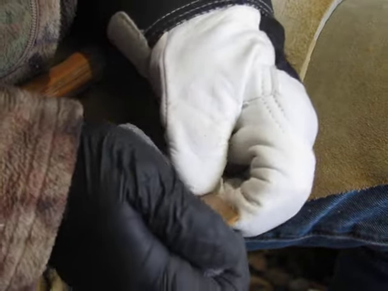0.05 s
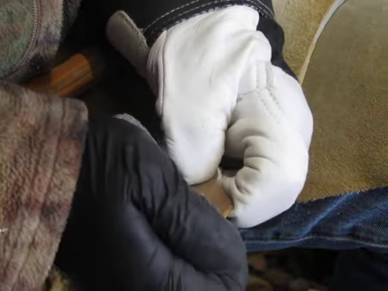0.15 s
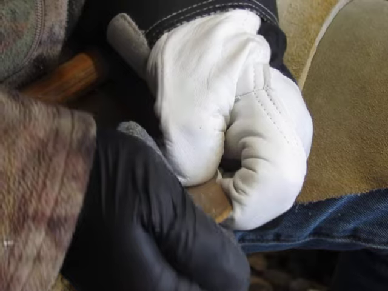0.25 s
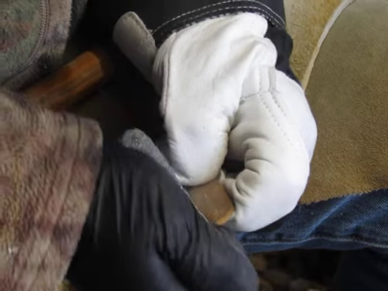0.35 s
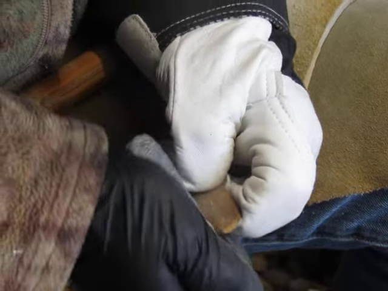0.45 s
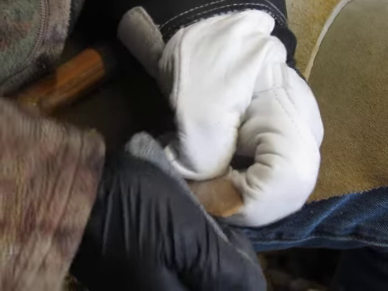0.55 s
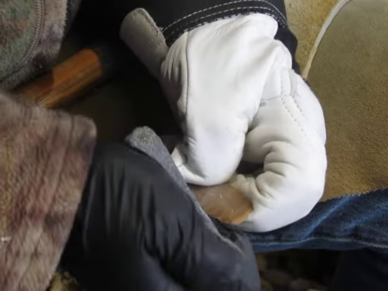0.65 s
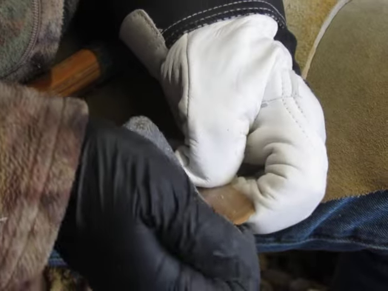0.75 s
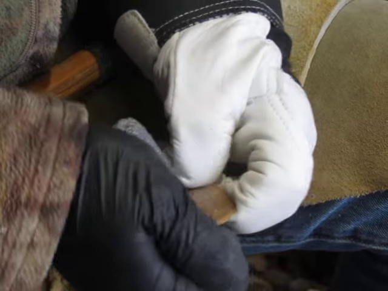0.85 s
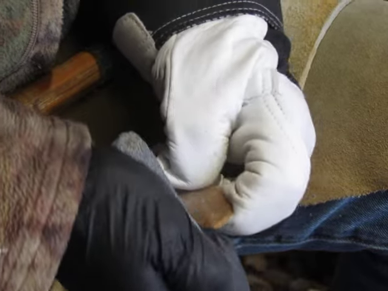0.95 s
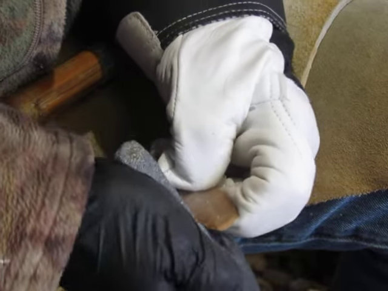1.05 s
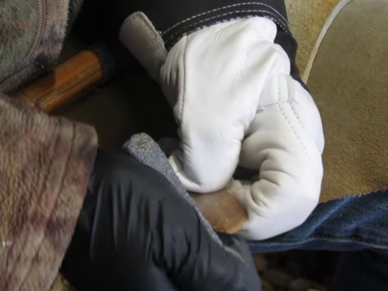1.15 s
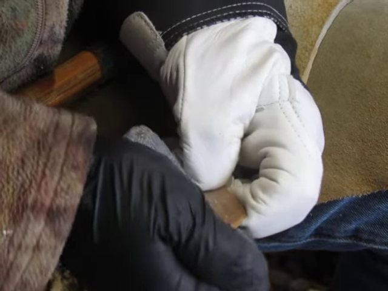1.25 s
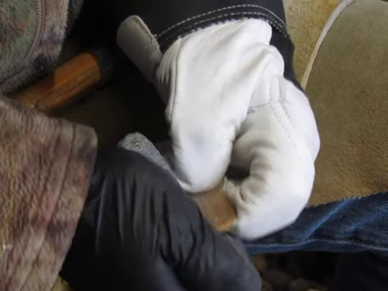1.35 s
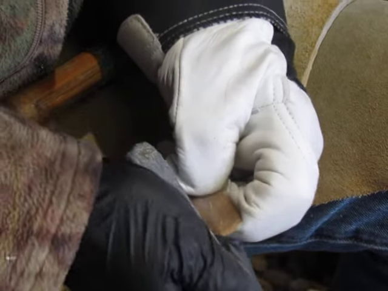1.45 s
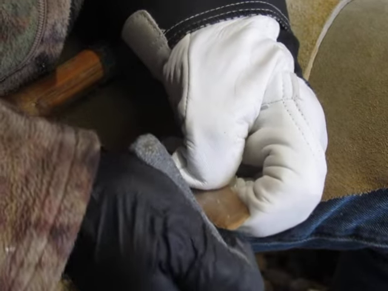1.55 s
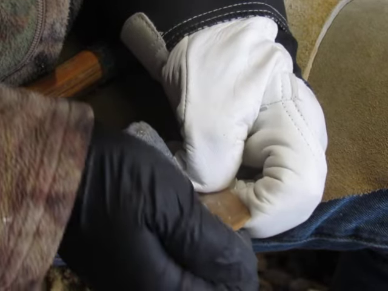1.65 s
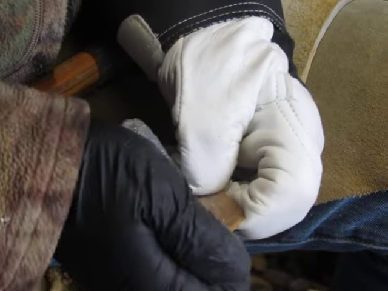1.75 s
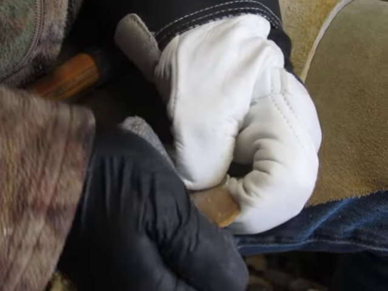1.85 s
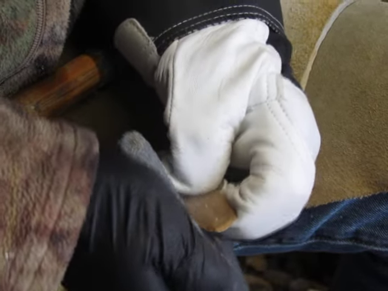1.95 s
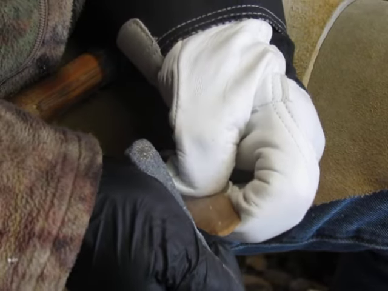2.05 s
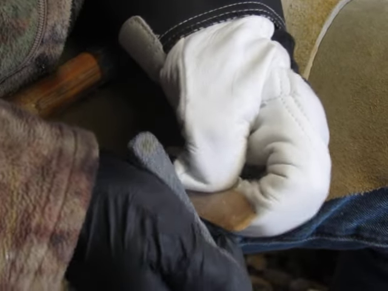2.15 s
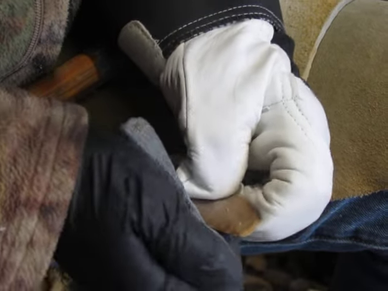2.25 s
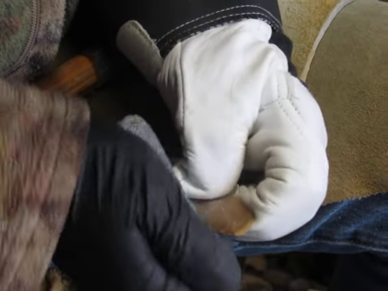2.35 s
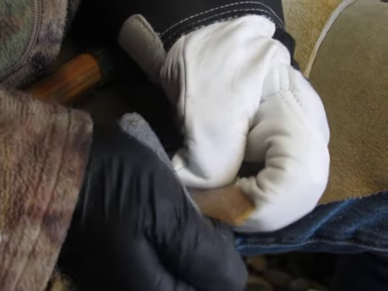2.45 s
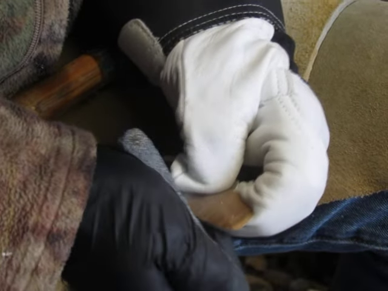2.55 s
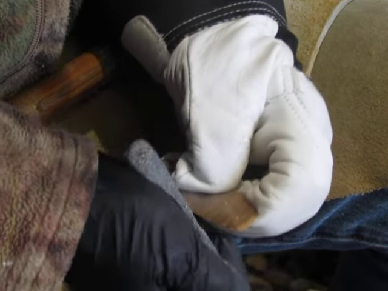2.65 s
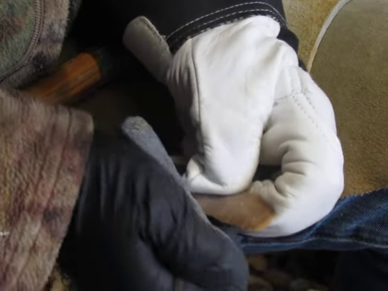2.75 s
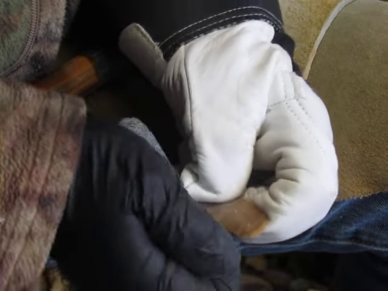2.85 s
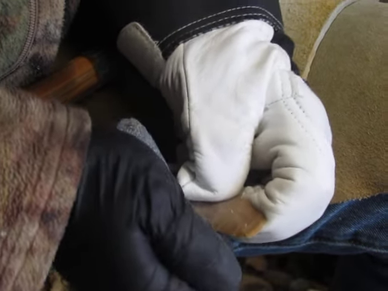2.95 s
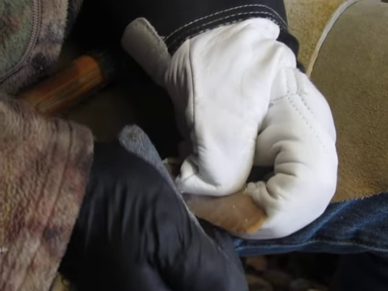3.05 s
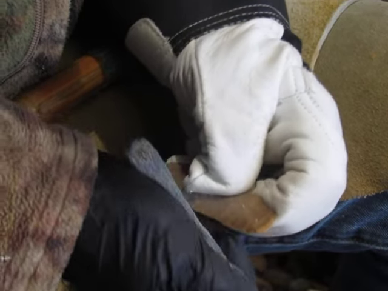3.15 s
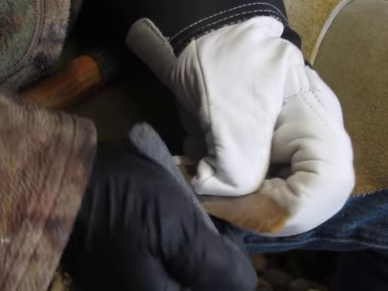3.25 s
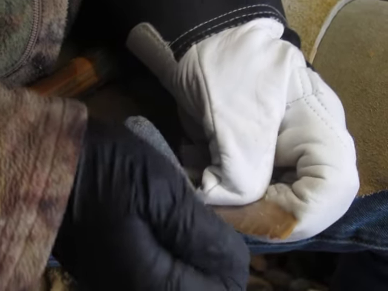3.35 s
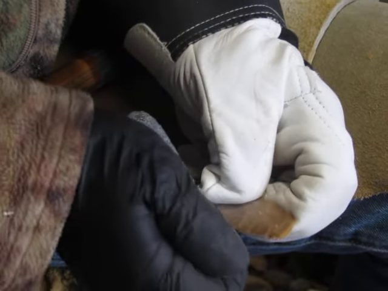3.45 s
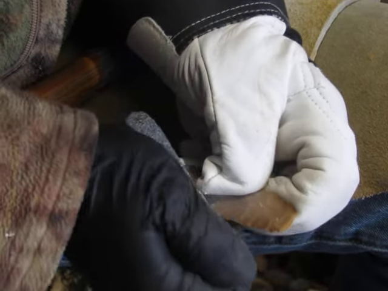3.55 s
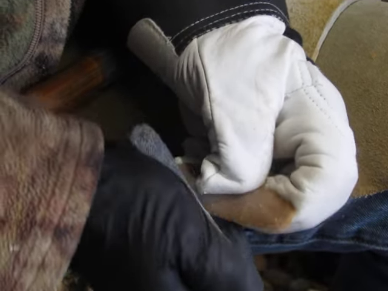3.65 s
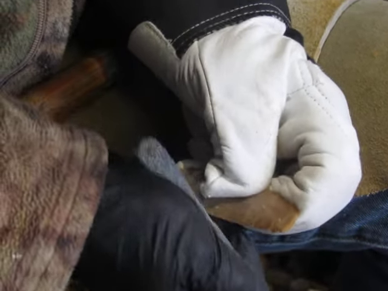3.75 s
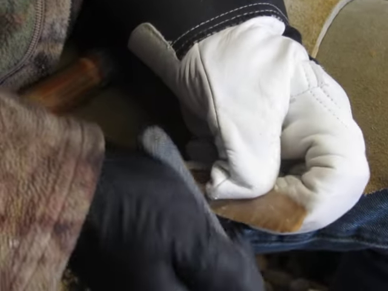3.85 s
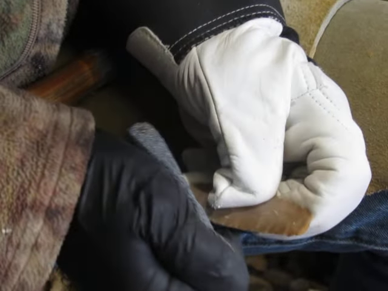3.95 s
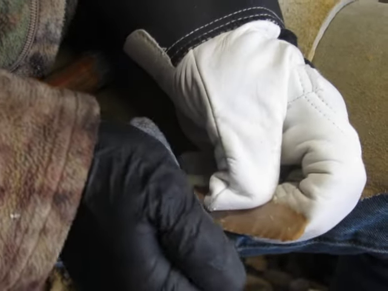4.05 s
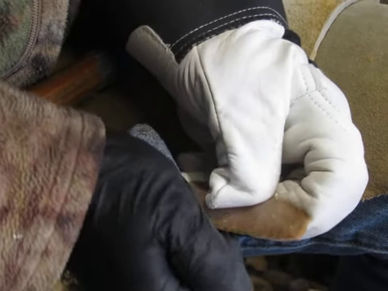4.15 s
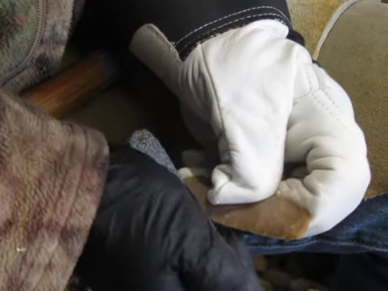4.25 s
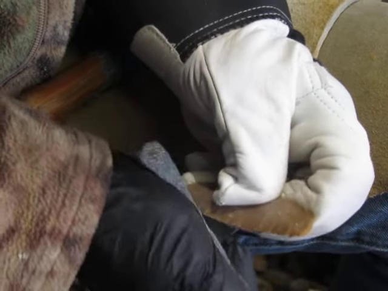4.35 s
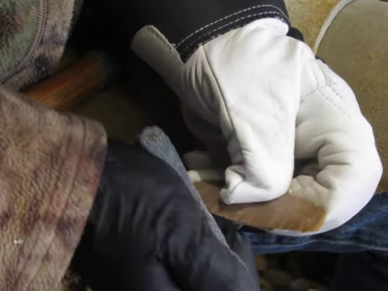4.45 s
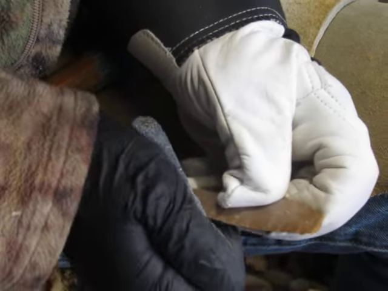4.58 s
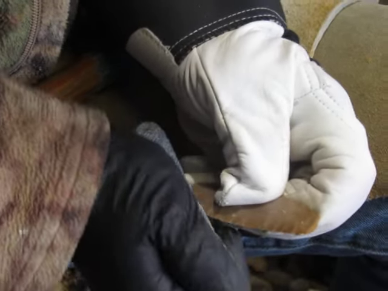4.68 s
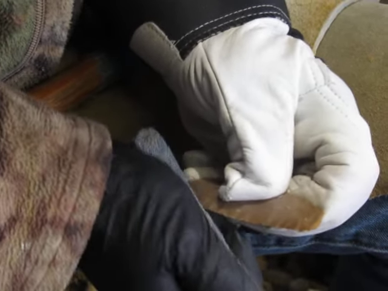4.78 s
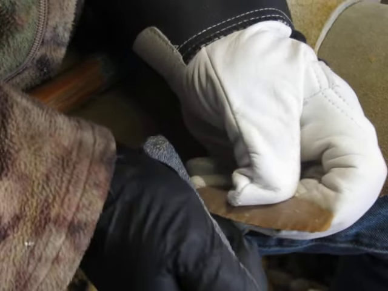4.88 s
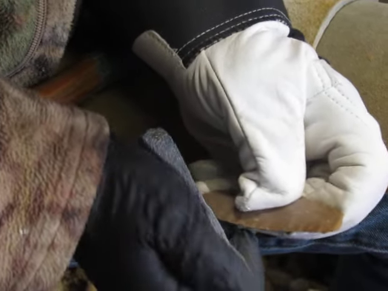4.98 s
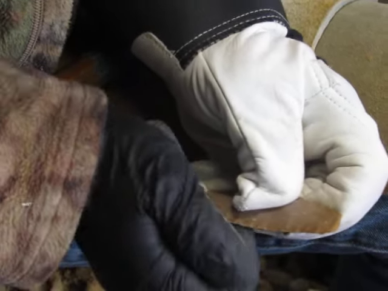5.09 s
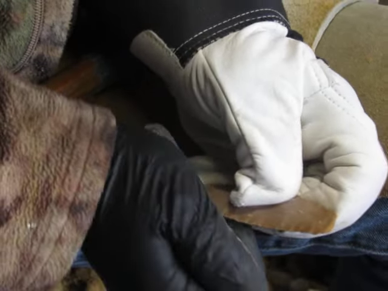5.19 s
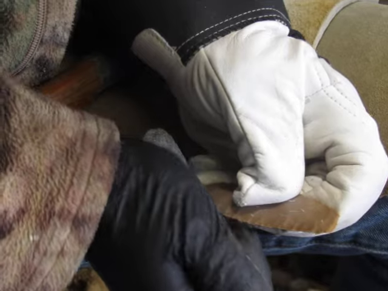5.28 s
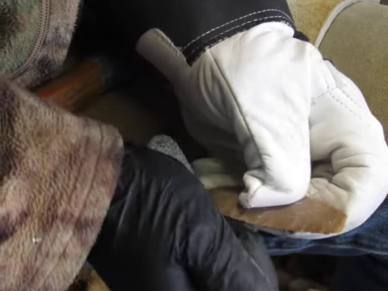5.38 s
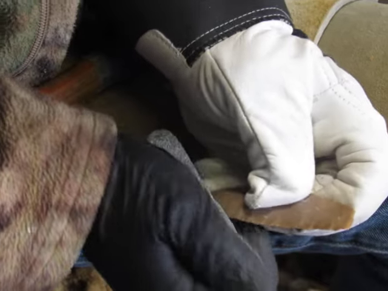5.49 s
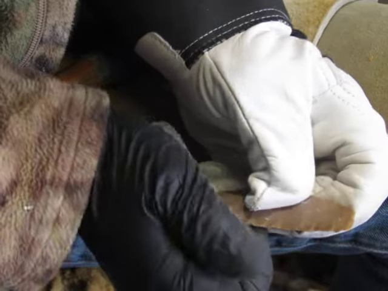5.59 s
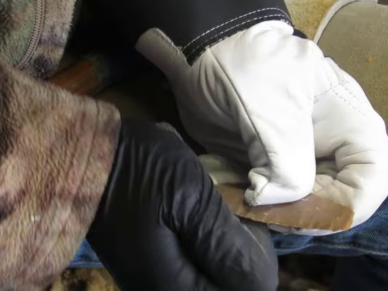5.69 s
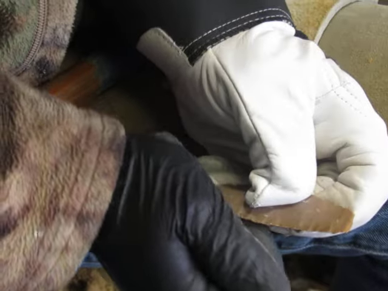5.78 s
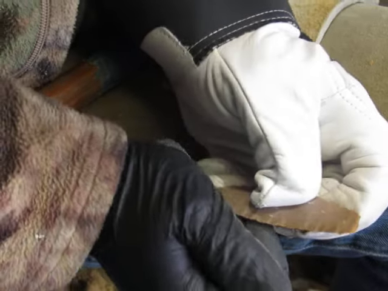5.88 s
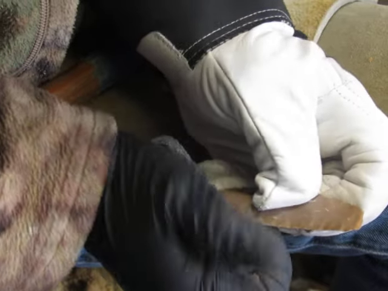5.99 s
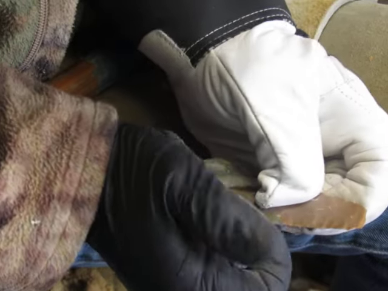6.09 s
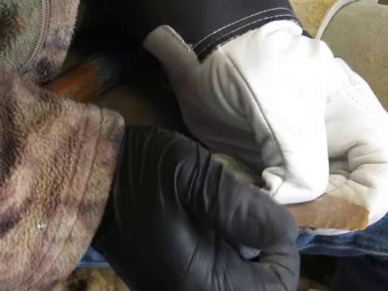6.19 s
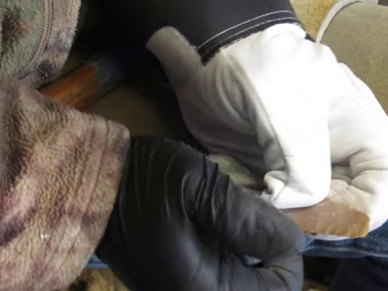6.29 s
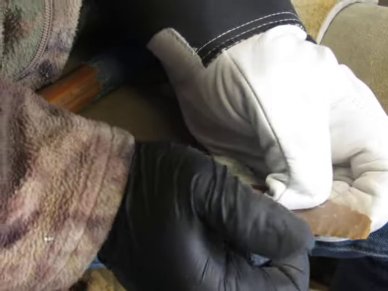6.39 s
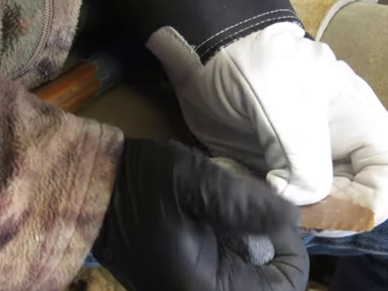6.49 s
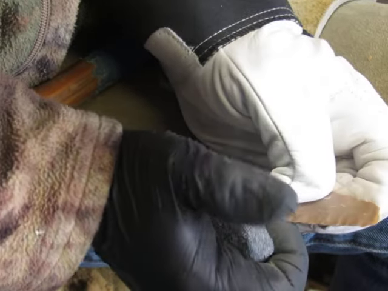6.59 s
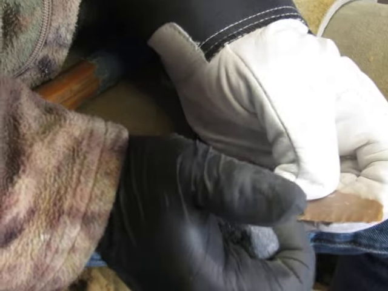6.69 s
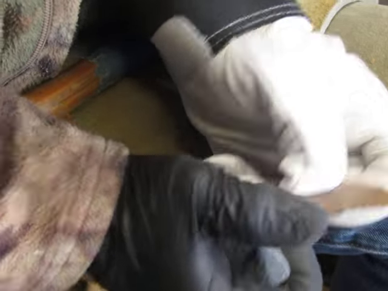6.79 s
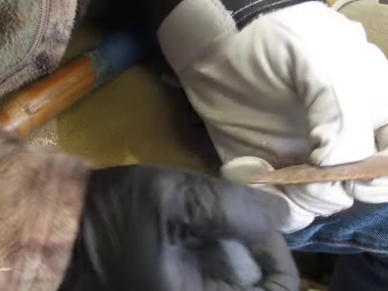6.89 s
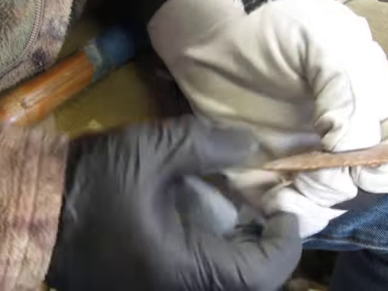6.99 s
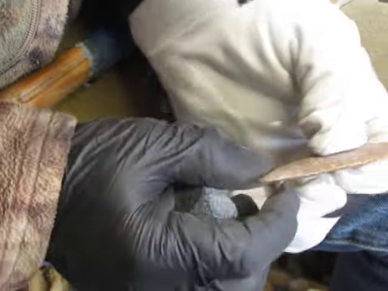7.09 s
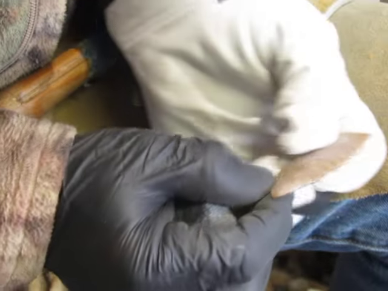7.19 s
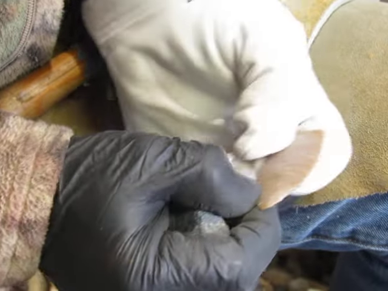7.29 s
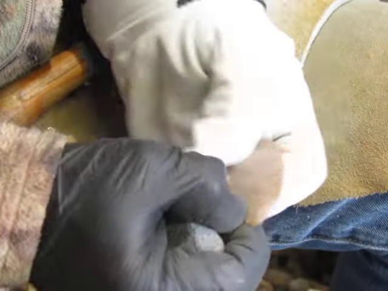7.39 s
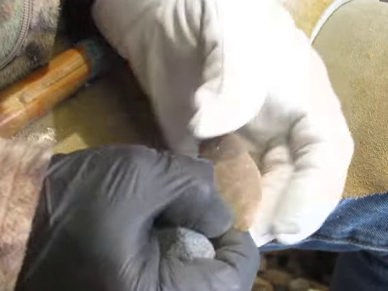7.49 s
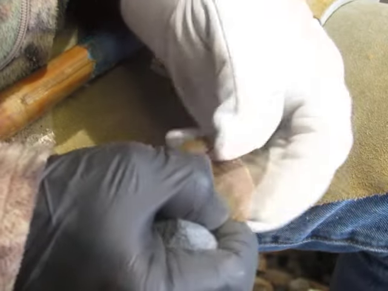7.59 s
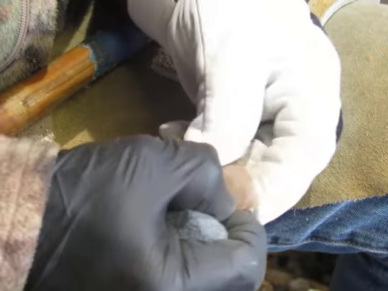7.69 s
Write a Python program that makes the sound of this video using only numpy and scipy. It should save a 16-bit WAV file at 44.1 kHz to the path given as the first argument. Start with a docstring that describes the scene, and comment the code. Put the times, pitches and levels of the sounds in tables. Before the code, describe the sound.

A close stereo microphone in a small workshop hears a coarse little stone grinding a stone edge. A dull sleeve brush fades over the first half second while soft bright hiss sinks away by about 1.2. From 0.1 come short gritty rubs and crisp crunches, with strong snaps near 0.3, 0.55, 1.0 and 2.0 and small gaps between. Faint sliding bird whistles sound around 0.8 and 1.15. From 2.4 the scraping thickens into repeated rasping strokes; from 3.5 to 6.4 they come in busy bunches about every half second, each catch brittle and bright, shedding fine crumbs, with occasional dull taps. Strokes soften and stop by about 6.85. A quiet, wavering low engine hum and distant traffic lie underneath, traffic swelling slightly near 5 and toward the end. Hiss returns around 6.9, with two faint falling whistles just after 7.0 and 7.3, until 7.7.

```python
"""A small coarse stone grinds the edge of a hand-held chert blade in a workshop. Random grains of grit
shake the two stones, which ring briefly: light rubs, sharp catches that shed crumbs, dull taps on contact.
The ring changes colour as the grip shifts. A sleeve brushes; a bright background hiss sinks while the
grinding is under way and rises again as it ends; both are shaped noise. Outside, an engine idles as a few
steady tones, traffic swells as low noise, and a bird whistles as a gliding tone."""
import sys
import numpy as np
from scipy import signal
from scipy.fft import rfft, irfft
from scipy.io import wavfile
from scipy.ndimage import map_coordinates

SR = 44100
rng = np.random.default_rng(int(sys.argv[2]) if len(sys.argv) > 2 else 0)


def dump_mix(stems):
    """Bounce the given channels to the path in sys.argv[1] as a 16-bit WAV at rate SR."""
    frames = np.atleast_2d(stems).T  # one column per channel
    limited = np.clip(frames, -1, 1)  # hard clip at full scale
    pcm = np.round(limited * 32767).astype(np.int16)
    wavfile.write(sys.argv[1], SR, pcm)


N = 340893
TIME = np.arange(N) / SR


def from_db(db):
    """Turn decibels into a gain."""
    return 10 ** (np.asarray(db) / 20)


def rms_one(x):
    """Scale a sound to an rms (average strength) of 1."""
    return x / np.sqrt(np.mean(x ** 2) + 1e-20)


def in_time(rows):
    """Join the points of a curve with straight lines, at every sample."""
    return np.interp(TIME, *np.transpose(rows))


def at_hz(points, hz):
    """Read a curve over pitch, with pitch on a log scale as the ear hears it."""
    points = np.array(points)
    return np.interp(np.log(np.maximum(hz, 1)), np.log(points[:, 0]), points[:, 1])


def drift(rate_hz, size):
    """Smooth random wandering around zero, with a spread of about 1."""
    knots = rng.standard_normal(int(size / SR * rate_hz) + 4)
    return map_coordinates(knots, [1 + np.arange(size) / SR * rate_hz], order=2, mode="nearest")


def add(out, sound, start_s):
    """Mix a sound in at a given time."""
    i = max(round(start_s * SR), 0)
    out[i:i + len(sound)] += sound[:len(out) - i]


# how alike the left and right of the background are: pitch_hz, correlation (no unit)
LEFT_RIGHT_LIKENESS = [(60, 0.4), (150, 0.65), (300, 0), (800, 0.07), (4000, 0.26)]


def background(spectrum):
    """Stereo noise from all around: random waves shaped to a colour, rms 1."""
    hz = np.arange(N // 2 + 1) * SR / N
    alike = np.clip(at_hz(LEFT_RIGHT_LIKENESS, hz), -1, 1)
    mid, side = rfft(rng.standard_normal((2, N)))
    pair = np.sqrt(1 + alike) * mid + np.sqrt(1 - alike) * side * [[1], [-1]]
    return rms_one(irfft(pair * from_db(at_hz(spectrum, hz)), N))


# colour of the still workshop air: pitch_hz, level_db (per Hz)
AIR_COLOUR = [(25, -21), (55, 1.5), (100, -1), (180, 0), (300, -12), (600, -18), (1500, -13.5),
              (9000, -29.5), (15000, -29.5)]


def still_air():
    """The still air of the workshop: a steady, soft noise."""
    return from_db(-53) * background(AIR_COLOUR)


# strength of the bright hiss: time_s, level_db
HISS_LEVEL = [(0, -52), (.8, -55), (1.25, -85), (6.3, -76), (6.9, -53.5), (7.73, -53.5)]
# colour of the bright hiss: pitch_hz, level_db (per Hz)
HISS_COLOUR = [(500, 1), (3000, -2), (10500, -8), (15000, 0.5)]


def bright_hiss():
    """A bright background hiss sinks while the grinding is under way and rises again as it ends."""
    return from_db(in_time(HISS_LEVEL)) * background(HISS_COLOUR)


# swell of the distant traffic: time_s, level_db
TRAFFIC_SWELL = [(0, -57), (2.5, -56.5), (5, -51), (5.7, -54.5), (6.6, -51), (7.7, -48.5)]
# colour of the traffic: pitch_hz, level_db (per Hz)
TRAFFIC_COLOUR = [(40, -11), (70, -1), (120, -6.5), (225, -0.5), (320, -6), (390, -3), (560, -9), (920, -4),
                  (1500, -14), (3000, -36), (8000, -45.5)]


def traffic():
    """Distant traffic: mostly low noise that slowly swells and sinks."""
    return from_db(in_time(TRAFFIC_SWELL)) * background(TRAFFIC_COLOUR)


# engine tones of the firing throb: order (multiple of the turning rate), level_db (added to the throb)
FIRING_TONES = [(3, -12), (4, 0.5), (5, -4), (6, -17.5)]
# engine tones of the drone: order (multiple of the turning rate), level_db (added to the drone)
DRONE_TONES = [(6.94, 3), (8.92, -14)]
# strength of the firing throb: time_s, level_db
THROB_LEVEL = [(0, -41.5), (.5, -53.5), (1.7, -47), (2.3, -49), (2.7, -47.5), (3.6, -48.5), (4.2, -50),
               (5.1, -51), (5.5, -66), (7.73, -50.5)]
# strength of the drone: time_s, level_db
DRONE_LEVEL = [(0, -47), (.3, -48), (.57, -62.5), (.95, -45.5), (1.3, -49.5), (1.7, -63), (3.1, -54.5),
               (3.8, -64), (4.6, -54), (7.73, -63.5)]
IDLE_HZ = 19.95  # turns per second, before a slight wander


def engine(wander=0.0048, waver_db=1.5, ear_phase=0.53):
    """A far engine at idle: low tones at multiples of its turning rate, each wavering in level."""
    turns = np.cumsum(IDLE_HZ * (1 + wander * drift(2.5, N))) / SR
    out = np.zeros((2, N))
    for tones, level_db in [(FIRING_TONES, in_time(THROB_LEVEL)), (DRONE_TONES, in_time(DRONE_LEVEL))]:
        for order, tone_db in tones:
            # each ear hears the tone shifted the opposite way (phase in radians)
            phase = 2 * np.pi * (order * turns + rng.random()) + ear_phase * np.array([[1], [-1]])
            loudness = from_db(level_db + tone_db + waver_db * drift(5.8, N))
            out += np.sqrt(2) * loudness * np.sin(phase)
    return out


# bird whistles: start_s, level_db (before the shape of the call and the room)
BIRD_WHISTLES = [(.83, -56), (1.15, -58), (7.03, -57), (7.335, -57)]
# glide of one whistle: time_s (into the call), pitch_hz (before a small wobble), level_db (added)
WHISTLE_GLIDE = [(0, 2810, -3), (.03, 2860, 1), (.07, 2880, -1), (.105, 2740, -3), (.16, 2380, -4)]


def bird():
    """A far bird repeats a pure whistle that holds, then slurs down."""
    out = np.zeros(N)
    s, hz, db = np.transpose(WHISTLE_GLIDE)
    t = np.arange(int(s[-1] * SR)) / SR
    for start, level_db in BIRD_WHISTLES:
        pitch = np.interp(t, s, hz) * (1 + 0.0041 * drift(56, len(t)))
        loudness = from_db(level_db + np.interp(t, s, db)) * signal.windows.tukey(len(t), .2)
        add(out, loudness * np.sin(2 * np.pi * np.cumsum(pitch) / SR), start)
    return out


# echoes off nearby surfaces: delay_ms (before a tiny random shift), level_db
NEARBY_ECHOES = [(3.4, -15), (6.1, -22), (10.1, -18), (19.8, -33.5), (30.8, -28.5)]
# fading tail of the room: pitch_hz, level_db (before wet_db is added), fade_s (time to fall by 60 dB)
ROOM_TAIL = [(300, -6.5, 0.25), (1700, -16.5, 0.18), (3960, -10.5, 0.22), (7000, -20, 0.32),
             (13900, -24.5, 0.29)]


def workshop(x, wet_db=0.0, scatter_db=-14, scatter_s=0.0014):
    """Direct sound, quick scatter off hands and lap, echoes and a tail fading band by band, per ear."""
    t = np.arange(SR // 2) / SR
    scatter = rms_one(rng.standard_normal((2, len(t))) * np.exp(-t / scatter_s))
    response = from_db(scatter_db) * scatter / np.sqrt(len(t))
    edges = np.geomspace(200, 18000, 9)
    room = np.array(ROOM_TAIL)
    for low, high in zip(edges, edges[1:]):
        hz = np.sqrt(low * high)
        decay = from_db(-60 * t / at_hz(room[:, [0, 2]], hz)) * (1 - np.exp(-t / 0.0018))
        tail = rms_one(rng.standard_normal((2, len(t))) * decay) / np.sqrt(len(t))
        band = signal.butter(2, [low, high], "band", fs=SR, output="sos")
        response += from_db(wet_db + at_hz(room, hz)) * signal.sosfilt(band, tail)
    for ms, db in NEARBY_ECHOES:
        arrival = ((ms + rng.uniform(-.06, .06, 2)) * SR / 1000).astype(int)
        response[[0, 1], arrival] += from_db(db)
    response[:, 0] += 1  # the direct sound
    return signal.fftconvolve(x[None], response, axes=1)[:, :N]


def microphone_case(pair, ripple=0.12):
    """Near sound bends round the case and returns a quarter millisecond later, flipped on the right."""
    lag = 11  # samples
    late = np.pad(pair, ((0, 0), (lag, 0)))[:, :N]
    return pair + ripple * np.array([[1], [-1]]) * late


# strength of the sleeve brush: time_s, level_db
SLEEVE_BRUSH = [(0, -41), (.1, -49), (.5, -69)]
# colour of the sleeve: pitch_hz, level_db (per Hz)
SLEEVE_COLOUR = [(30, -13.5), (90, 0.5), (220, 2.5), (600, -24.5), (3000, -60)]


def sleeve():
    """A sleeve brushes the knee as the hands settle: a dull noise that fades."""
    return from_db(in_time(SLEEVE_BRUSH)) * background(SLEEVE_COLOUR)


def stone_response(modes, hz, vary_db=1.75, detune=0.031):
    """Stones ring at several pitches at once; each contact shifts their pitch and strength a little."""
    s, out = 1j * hz, 0
    for k, (centre, width, db) in enumerate(modes):
        centre = centre * (1 + detune * rng.standard_normal())
        # neighbouring resonances push in opposite directions
        gain = (-1) ** k * from_db(db + vary_db * rng.standard_normal())
        out = out + gain * s * width / (s * s + s * width + centre ** 2)
    return out


# middles of the body, middle and top bands: pitch_hz
BAND_CENTRES = [3240, 6290, 10300]
# moments when the grip and the point of contact change: time_s
GRIP_SHIFTS = [2.1, 4.0, 4.6]
# ringing of the two stones, one list per grip: pitch_hz, width_hz, level_db (pitch and level vary a little)
STONE_RINGING = [
    [(770, 190, -6), (1480, 630, 1), (2850, 1150, 0), (4050, 1300, -12.5), (5650, 1480, 17.5),
     (6900, 3300, -17), (11010, 560, 11.5), (13950, 1200, -37)],
    [(780, 230, -24), (1330, 264, -4.5), (2360, 3360, -9.5), (4000, 580, -6.5), (5536, 370, -4.5),
     (7130, 480, -4.5), (11740, 1240, 6), (14860, 1800, -11.5)],
    [(1400, 740, 0), (1830, 790, 3), (3970, 2100, -2.5), (5360, 520, -2.5), (11500, 370, 11),
     (12050, 270, 1), (14900, 1740, 11)],
    [(796, 330, -39.5), (2010, 980, -8), (4030, 240, -7.5), (5520, 564, 15), (7460, 3330, 8.5),
     (9900, 2350, 6.5), (11940, 1080, 10.5), (15200, 1800, -30)],
]


def contact(force, start_s, level_db, body_db, top_db, length_s, size):
    """A gritty force rings the stones; coarse grit favours the body, fine grit the top."""
    hz = np.arange(size // 2 + 1) * SR / size
    modes = STONE_RINGING[np.searchsorted(GRIP_SHIFTS, start_s)]
    radiation = 1j * hz / (1j * hz + 140)  # weakens the lowest pitches
    sound = rfft(force, size) * stone_response(modes, hz) * radiation
    # find how strong each band is, then steer it towards the wanted balance
    band = np.searchsorted([4500, 9000], hz)
    band_db = 10 * np.log10(np.bincount(band, np.abs(sound) ** 2) + 1e-20)
    colour = from_db(at_hz(np.c_[BAND_CENTRES, [body_db, 0, top_db] - band_db], hz))
    sound = irfft(sound * colour, size)
    # the level counts over the length of the contact, not the whole buffer
    return from_db(level_db) * rms_one(sound) * np.sqrt(length_s * SR / size)


def grit(per_s, spread_db, size):
    """Grains break at random moments, a few much harder than the rest, over a faint hiss."""
    strength = from_db(spread_db * np.minimum(rng.exponential(1, size), 4)) * rng.choice([-1, 1], size)
    return strength * (rng.random(size) < per_s / SR) + 0.062 * rng.standard_normal(size)


# colour of the place being ground: time_s, body_db, top_db (both relative to the middle band, before shifts)
EDGE_PLACES = [(.3, 0, -5.5), (.55, 6, 5.5), (1, 3.5, -4), (1.42, 2.5, 0), (2, -2, -2.5), (2.5, -7, -15.5),
               (3.05, -10, -7), (3.2, 0.5, 2.5), (3.62, -12, -8), (3.75, 0, 5.5), (4.2, -8, 0.5),
               (4.35, -3.5, 6), (4.75, -8, -6.5), (5.25, -6.5, 5.5), (5.8, -3.5, 3), (6.3, -4, 2),
               (6.75, -8.5, -4)]


def edge_colour(s):
    """Body and top (dB) of the edge at a given time, as the work moves along it."""
    times, body_db, top_db = np.transpose(EDGE_PLACES)
    return np.array([np.interp(s, times, body_db), np.interp(s, times, top_db)])


COLOUR_SPREAD_DB = 2.78  # from one fracture to the next


def fracture(start_s, length_s, level_db, extra_body_db=0):
    """A burst of tiny breaks in the stone swells and stops."""
    swell = np.sin(np.linspace(0, np.pi, int(np.clip(length_s * SR, 22, 1024))))
    force = grit(per_s=16000, spread_db=3.0, size=1024)[:len(swell)] * swell
    body_db, top_db = edge_colour(start_s) + COLOUR_SPREAD_DB * rng.standard_normal(2)
    return contact(force, start_s, level_db, body_db + extra_body_db, top_db, len(swell) / SR, size=2048)


# taps as the abrading stone is set down on the edge: start_s, level_db (rms)
STONE_TAPS = [(.857, -37), (4.072, -43.5), (4.675, -42), (5.153, -38), (5.665, -41.5)]
TAP_S, TAP_BODY_DB = 0.0029, 18.5  # length of a tap, and its extra body


def touches():
    """Dull little taps as the stones meet."""
    out = np.zeros(N)
    for s, level_db in STONE_TAPS:
        add(out, fracture(s, TAP_S, level_db, TAP_BODY_DB), s)
    return out


def slips(size, per_s=170, spread_db=7, slip_s=0.0019, slide=0.58):
    """Stick and slip: brief small surges of friction on top of even sliding."""
    starts = (rng.random(size) < per_s / SR) * from_db(spread_db * np.minimum(rng.exponential(1, size), 3))
    surge = np.hanning(int(np.clip(slip_s * SR, 20, 200)))
    return slide + np.convolve(starts, surge, "same")


# to-and-fro strokes of the abrading stone: start_s, end_s, level_db (rms, before trim_db)
RUB_STROKES = [(0.109, 0.153, -51), (0.179, 0.243, -39), (0.25, .37, -46), (0.528, 0.572, -34),
               (0.615, 0.684, -40.5), (0.883, 0.97, -45.5), (0.983, 1.08, -56), (1.14, 1.166, -43),
               (1.33, 1.363, -48), (1.391, 1.463, -26.5), (1.574, 1.694, -48.5), (1.716, 1.738, -38.5),
               (1.861, 1.923, -37.5), (2.076, 2.116, -47), (2.158, 2.279, -45), (2.38, 2.54, -47),
               (2.628, 2.678, -30), (2.724, 2.769, -36), (2.98, 2.99, -34), (3.05, 3.172, -43),
               (3.184, 3.228, -34), (3.267, 3.32, -39), (3.526, 3.71, -39), (3.804, 3.85, -32.5),
               (3.882, 3.923, -43), (4.117, 4.192, -36), (4.214, 4.43, -44.5), (4.447, 4.484, -37),
               (4.702, 4.865, -39.5), (4.954, 5.004, -38.5), (5.159, 5.421, -38), (5.478, 5.519, -37.5),
               (5.681, 5.914, -41), (5.996, 6.071, -34), (6.155, 6.268, -43.5), (6.333, 6.39, -39),
               (6.521, 6.6, -37.5), (6.649, 6.816, -45.5)]
STROKE_FADE = 0.15  # share of a stroke spent swelling and fading
# sliding is duller than a catch, and a stroke that only skims has more body still
SLIDE_BODY_DB, SLIDE_TOP_DB, SKIM_BODY_DB = 2, -2.5, 5


def rubs(trim_db=-1.0, colour_db=4.0):
    """Grit slides on two points of differing colour at once; strokes with no catch only skim."""
    out = np.zeros(N)
    size, longest = 16384, 15000  # samples
    for start, end, level_db in RUB_STROKES:
        stroke = signal.windows.tukey(int(np.clip((end - start) * SR, 256, longest)), STROKE_FADE)
        skims = not any(start < s < end for s, _, _ in EDGE_CATCHES)
        slide_db = [SLIDE_BODY_DB + skims * SKIM_BODY_DB, SLIDE_TOP_DB]
        body_db, top_db = edge_colour((start + end) / 2) + slide_db
        for lean_db in (colour_db, -colour_db):
            friction = grit(per_s=16000, spread_db=2.5, size=size) * slips(size)
            force = friction[:len(stroke)] * stroke
            point = contact(force, start, level_db + trim_db, body_db + lean_db, top_db - lean_db,
                            len(stroke) / SR, size)
            add(out, point / np.sqrt(2), start)
    return out


# hard catches of the edge: centre_s, length_ms, level_db (rms)
EDGE_CATCHES = [(0.26, 5.9, -23.5), (0.2826, 2.7, -17.5), (0.2894, 5.5, -17), (0.322, 3.8, -15),
                (0.3973, 6.7, -15.5), (0.5426, 3.26, -14.5), (.552, 2.16, -15.5), (0.9016, 4.8, -29.5),
                (.947, 5.8, -27.5), (0.9943, 2.46, -11), (1.0501, 7.1, -19.5), (1.3951, 2.5, -36),
                (1.4259, 1.15, -18), (1.435, 5, -29.5), (2.012, 3.1, -9), (2.032, 4.2, -23.5),
                (2.4186, 5.9, -27.5), (2.434, 2.5, -29), (2.4675, 2, -16), (2.4901, 2, -25),
                (2.5187, 5, -17), (2.5324, 4.6, -24), (2.6129, 2.13, -13.5), (2.6665, 1.55, -23),
                (2.986, 2.06, -25.5), (3.0343, 2.1, -25.5), (3.051, 7.3, -15), (3.0742, 7.5, -22),
                (3.1051, 5, -21), (3.1909, 1.9, -19), (3.2019, 3, -19), (3.5808, 3.4, -16.5),
                (3.616, 1.4, -23), (3.6628, 3.7, -12.5), (3.6739, 3.7, -16), (3.6886, 2.44, -14.5),
                (3.726, 4.4, -15), (3.8096, 1.67, -24.5), (4.1577, 3.2, -16.5), (4.2284, 8, -18.5),
                (4.248, 2.3, -14.5), (4.282, 2.4, -18), (4.3074, 1.9, -18), (4.3547, 6.1, -12),
                (4.7042, 5.2, -26.5), (4.7268, .9, -21), (4.7412, 3.6, -11.5), (4.7755, 3.45, -16.5),
                (4.808, 4, -21.5), (5.1755, 4.6, -28), (5.2012, 4.6, -15.5), (5.2307, 1.9, -16.5),
                (5.249, 5.3, -12.5), (5.324, 2.4, -14.5), (5.3577, 4.3, -19.5), (5.689, 3.8, -32),
                (5.7011, 2.4, -20), (5.7159, 5, -19), (5.7491, 5.3, -20), (5.774, 4.2, -23),
                (5.8406, 3.3, -20.5), (5.8614, 4.2, -20.5), (5.878, 3.9, -28.5), (5.8962, 2, -15.5),
                (5.998, 3, -28), (6.0236, 6.3, -23), (6.166, 1.03, -21.5), (6.2334, 3.6, -17),
                (6.3334, 5.4, -21.5), (6.3482, 2.2, -21), (6.3617, 1.74, -17), (6.392, 2.95, -16.5),
                (6.497, 1.4, -25.5), (6.6648, 3, -29), (6.7, 4, -25.5), (6.728, 3.44, -18),
                (6.8272, 0.71, -26)]
# crumbs after each catch: average gap and length
CRUMB_GAP_S, CRUMB_S = .01, 0.0019
# drop of the first crumb below its catch, further drop of each next one, random scatter
CRUMB_DROP_DB, CRUMB_FADE_DB, CRUMB_SPREAD_DB = 21, 5.5, 6


def catches(count=3):
    """The edge bites and breaks, then sheds a few crumbs that tend to get softer."""
    out = np.zeros(N)
    for s, ms, level_db in EDGE_CATCHES:
        length = ms / 1000
        start = s - length / 2 - .0002  # a touch early
        add(out, fracture(start, length, level_db), start)
        for k in range(count):
            s += CRUMB_GAP_S * (.5 + rng.random())
            scatter_db = CRUMB_SPREAD_DB * rng.standard_normal()
            crumb_db = level_db - CRUMB_DROP_DB - k * CRUMB_FADE_DB + scatter_db
            add(out, fracture(s, CRUMB_S, crumb_db), s)
    return out


def scene():
    """The stones close by and central, with the softer sounds around them."""
    stones = microphone_case(workshop(touches() + catches() + rubs(), wet_db=6.0))
    song = from_db(-1) * workshop(bird(), wet_db=10)
    return stones + sleeve() + bright_hiss() + engine() + traffic() + still_air() + song


PORT_HZ, PORT_Q = 11700, 1.084  # resonance shared by the two microphone ports, and its sharpness
NOTCH_HZ, NOTCH_WIDTH_HZ = (13500, 12720), 570  # pitch cancelled by the left and right port
CUTOFF_HZ = 15800


def record(dry):
    """Microphone ports resonate and cancel a narrow treble band; peaks are clipped, the top cut."""
    w = 2 * np.pi * PORT_HZ / SR
    damping = np.sin(w) / (2 * PORT_Q)
    feed = (1 - np.cos(w)) / 2 * np.array([1, 2, 1])
    ported = signal.lfilter(feed, [1 + damping, -2 * np.cos(w), 1 - damping], dry)
    notched = [signal.lfilter(*signal.iirnotch(hz, hz / NOTCH_WIDTH_HZ, fs=SR), side)
               for hz, side in zip(NOTCH_HZ, ported)]
    low_pass = signal.ellip(10, .1, 70, CUTOFF_HZ, fs=SR, output="sos")
    return signal.sosfilt(low_pass, np.clip(notched, -1, 1))


dry = scene()
out = record(dry)
dump_mix(out)
```